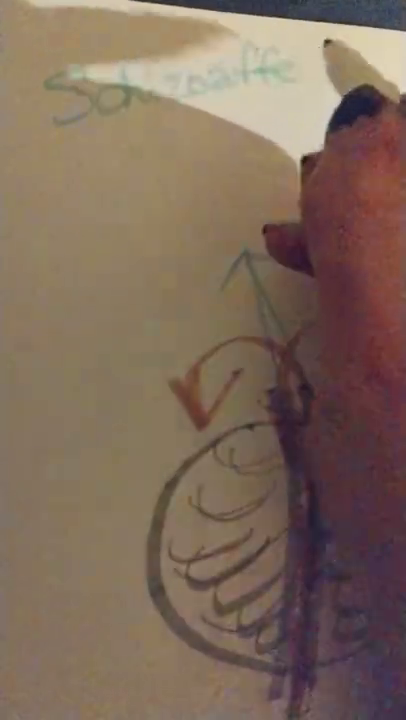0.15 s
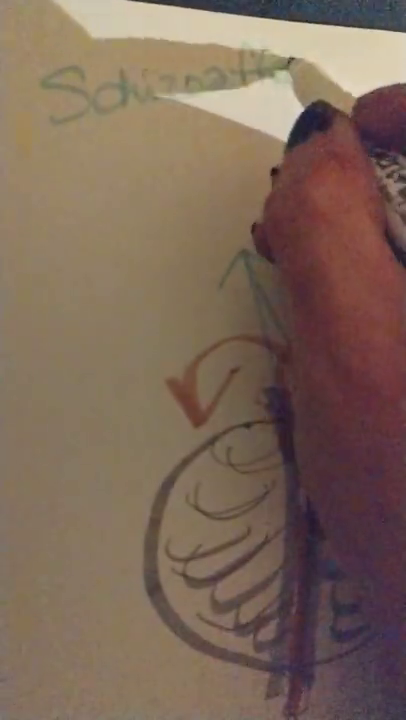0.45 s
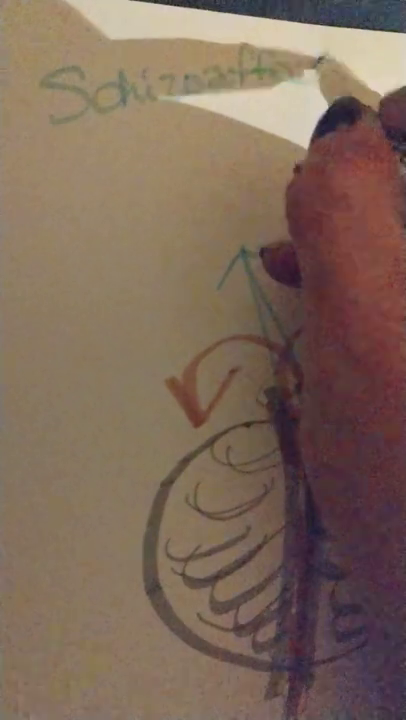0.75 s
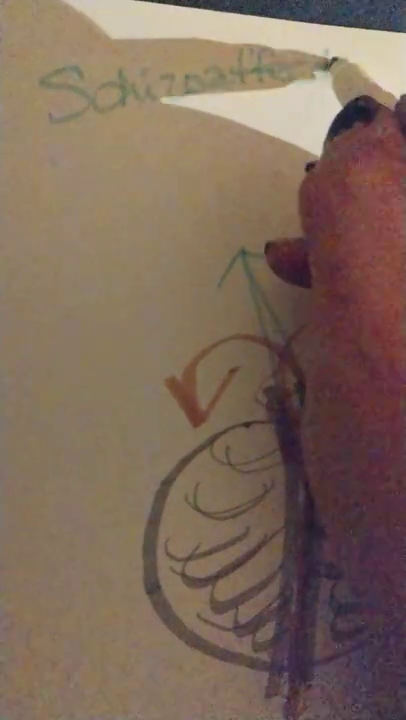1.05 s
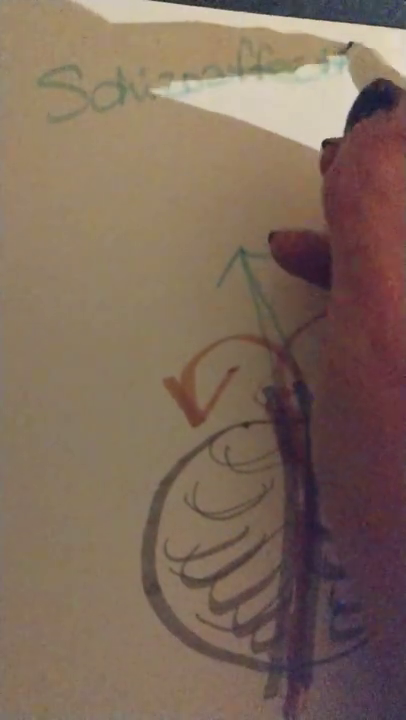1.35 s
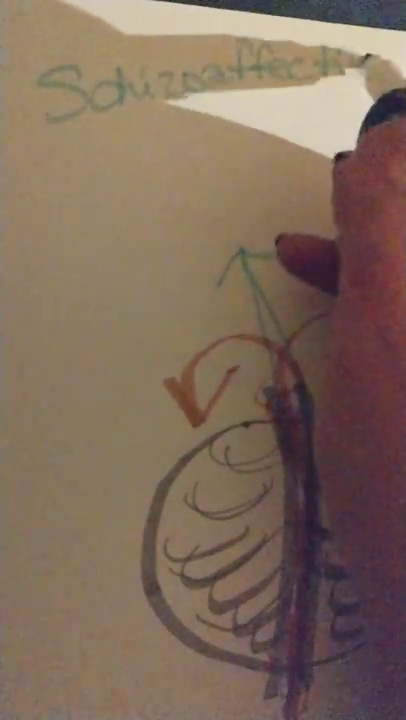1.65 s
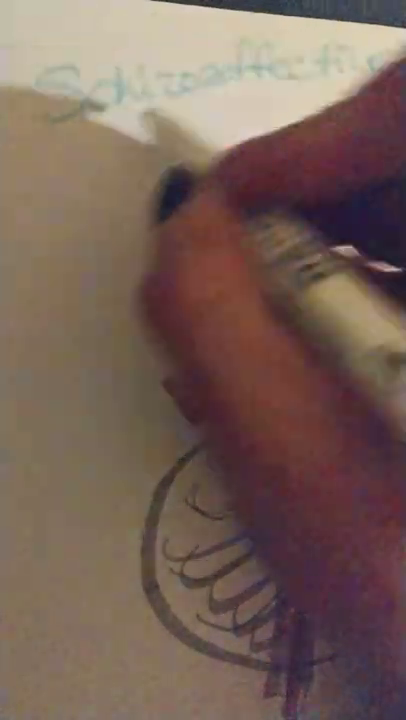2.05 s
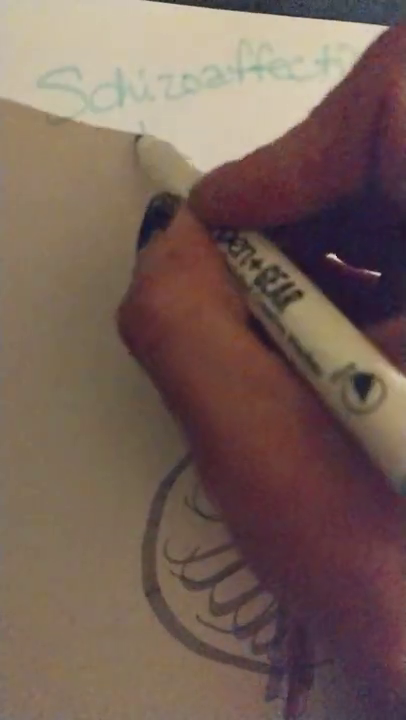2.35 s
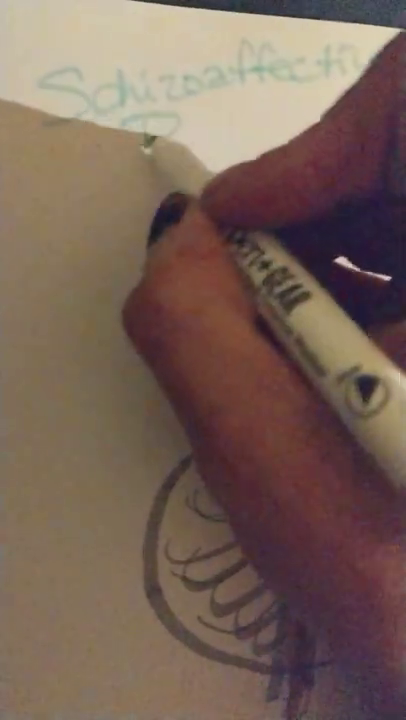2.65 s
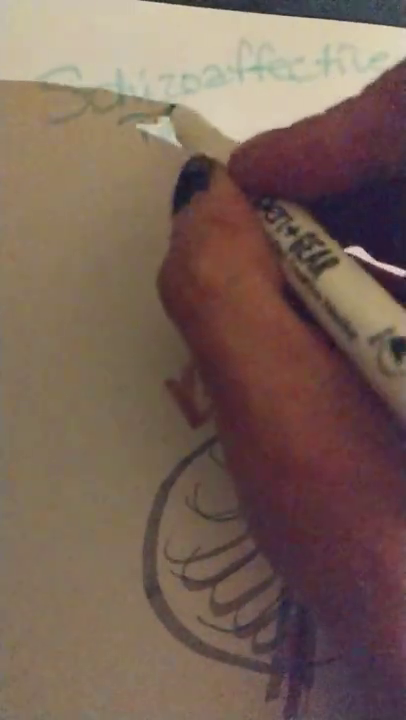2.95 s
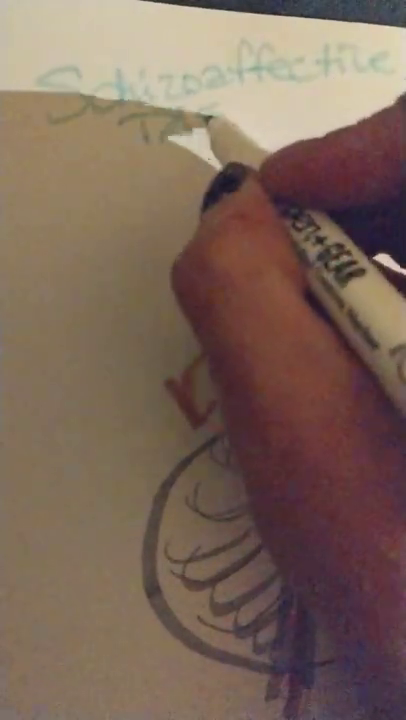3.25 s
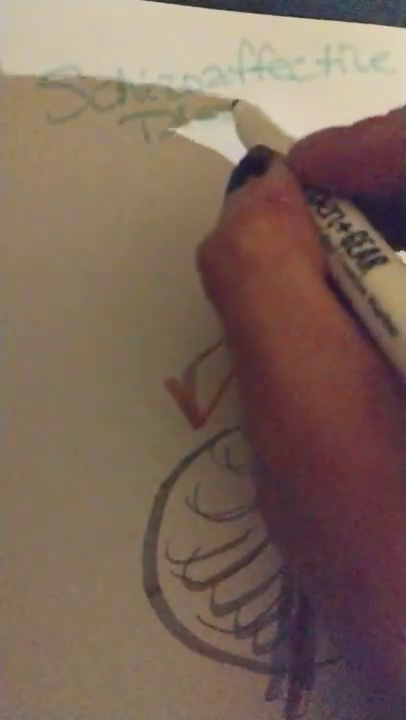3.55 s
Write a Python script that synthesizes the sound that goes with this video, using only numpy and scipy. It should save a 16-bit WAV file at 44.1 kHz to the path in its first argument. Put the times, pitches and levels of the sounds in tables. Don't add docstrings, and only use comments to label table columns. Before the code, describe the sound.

A felt marker tip scratches quick, irregular, high strokes on paper in a quiet room.

```python
import sys
import numpy as np
from scipy import signal
from scipy.fft import rfft, irfft
from scipy.io import wavfile

SR = 44100
rng = np.random.default_rng(int(sys.argv[2]) if len(sys.argv) > 2 else 0)


def generate_wav(sig):
    pcm = np.round(np.clip(np.atleast_2d(sig).T, -1, 1) * 32767).astype(np.int16)
    wavfile.write(sys.argv[1], SR, pcm)


def undo_db(level):
    steps = np.asarray(level, float) / 20
    return 10 ** steps


N = 163170

# start in seconds, length in seconds, level in dB,
# fastest moment as a share of the stroke (0-1), breadth of the sound in dB per octave.
TIP_STROKES = [(-0.02, 0.051, -46.5, 0.22, 8), (0.046, 0.086, -35.5, 0.61, 4.5),
               (0.449, 0.029, -57, 0.06, 9), (0.537, 0.04, -38.5, 0.3, 5.5), (0.62, 0.094, -33, 0.39, 3.5),
               (0.746, 0.037, -46, 0.19, 6), (0.936, 0.038, -55, 0.2, 9), (0.972, 0.035, -52, 0.22, 7),
               (1.035, 0.043, -37.5, 0.73, 5), (1.079, 0.045, -37, 0.19, 4.5),
               (1.333, 0.037, -46.5, 0.2, 2), (1.395, 0.062, -40.5, 0.15, 1),
               (1.548, 0.076, -42.5, 0.71, 7), (1.741, 0.061, -39.5, 0.42, 4),
               (1.835, 0.051, -35.5, 0.2, 4.5), (1.9, 0.083, -33.5, 0.48, 4),
               (2.536, 0.023, -43.5, 0.3, 1.5), (2.583, 0.11, -28, 0.29, -2),
               (2.686, 0.085, -40, 0.47, 1.5), (2.776, 0.088, -39.5, 0.5, 2.5),
               (2.953, 0.035, -51, 0.77, -7), (3.063, 0.019, -43.5, 0.51, -11),
               (3.103, 0.019, -43, 0.2, -6), (3.196, 0.056, -31.5, 0.42, -3),
               (3.272, 0.073, -37, 0.55, 2.5), (3.365, 0.048, -34, 0.58, -0.5),
               (3.414, 0.0059, -41.5, 0.7, 4.5), (3.468, 0.044, -45, 0.5, 3),
               (3.586, 0.075, -37.5, 0.35, 1.5), (3.65, 0.12, -26, 0.66, 2.5)]
# frequency in Hz, gain in dB.
TIP_COLOUR = [(1000, -20), (2000, -17.5), (3600, -16), (5650, -15), (6150, -5), (8700, 1.5), (11400, 0),
              (15500, -26)]


def tip_strokes():
    return rub(TIP_STROKES, TIP_COLOUR, per_speed=1.61, snags_per_s=5000, spread_db=0.5, shade_db=0)


# time in seconds, peak level in dB.
HARD_SNAGS = [(0.0036, -38.5), (0.0753, -32.0), (0.0851, -28.0), (0.0928, -28.0), (0.0989, -25.0),
              (0.1191, -31.0), (0.6408, -22.5), (0.6519, -22.0), (0.6613, -19.0), (0.668, -22.5),
              (1.0632, -28.0), (1.0713, -33.0), (1.0835, -29.0), (1.3345, -39.5), (1.7696, -28.5),
              (1.847, -23.5), (1.8513, -25.5), (1.9305, -26.5), (1.9334, -24.0), (1.9385, -24.5),
              (1.9467, -24.5), (2.5413, -35.0), (2.5946, -20.0), (2.6082, -19.5), (2.6126, -18.5),
              (2.6165, -17.5), (2.6229, -21.0), (2.6306, -17.5), (2.6348, -18.0), (2.6429, -20.0),
              (2.6558, -23.0), (2.6645, -28.0), (3.109, -35.0), (3.2005, -31.5), (3.2248, -23.0),
              (3.2299, -22.0), (3.2334, -24.5), (3.2374, -28.5), (3.289, -34.5), (3.2988, -30.0),
              (3.3135, -27.5), (3.3892, -25.5), (3.3929, -25.0), (3.3962, -21.0), (3.4153, -31.0),
              (3.6072, -27.5), (3.6288, -30.0), (3.6885, -27.0), (3.6926, -24.5), (3.6975, -23.0)]
SNAG_DB, SNAG_SHEET_DB, SNAG_BREADTH_DB = -2, -6, -7
SNAG_S = 0.0009


def hard_snags():
    out = np.zeros((2, N + SR))
    tear_shape = np.hanning(round(2 * SNAG_S * SR))
    for s, peak_db in HARD_SNAGS:
        taps = response(TIP_COLOUR, 0, SNAG_SHEET_DB, SNAG_BREADTH_DB, line_tilt(s))
        tear = tear_shape * rng.standard_normal(len(tear_shape))
        tick = signal.fftconvolve(taps, tear[None], axes=1)
        at = max(round((s - SNAG_S) * SR), 0)
        out[:, at:at + tick.shape[1]] += undo_db(peak_db + SNAG_DB) * tick / abs(tick[0]).max()
    return out[:, :N]


# start in seconds, length in seconds, level in dB,
# fastest moment as a share of the slide (0-1).
HAND_SLIDES = [(-0.008, 0.15, -56, 0.58), (0.128, 0.15, -49.5, 0.67), (0.561, 0.18, -54.5, 0.44),
               (0.812, 0.11, -55.5, 0.27), (1.127, 0.11, -60, 0.32), (1.436, 0.22, -59, 0.43),
               (1.626, 0.081, -54.5, 0.28), (1.781, 0.099, -61, 0.4), (1.975, 0.076, -61.5, 0.4),
               (1.998, 0.2, -57, 0.62), (2.342, 0.08, -56.5, 0.22), (2.458, 0.013, -60.5, 0.7),
               (2.879, 0.087, -57, 0.1), (3.24, 0.029, -56, 0.76), (3.425, 0.052, -56.5, 0.55),
               (3.518, 0.23, -61.5, 0.15), (3.62, 0.083, -50, 0.1), (2.64, 0.065, -49, 0.06)]
# frequency in Hz, gain in dB.
HAND_COLOUR = [(1500, -48), (4000, 6), (6200, 3), (8700, 4), (11400, 7), (13400, 2), (15500, -16)]


def hand_slides():
    return rub(HAND_SLIDES, HAND_COLOUR, per_speed=0.92, snags_per_s=25000, spread_db=1, shade_db=-1.5)


def rub(rows, colour, per_speed, snags_per_s, spread_db, shade_db):
    out = np.zeros((2, N + 2 * SR))
    for start, length, level_db, fastest, *breadth in rows:
        chance = rng.random((SR // 4, 3))
        u = np.arange(0, min(length, 0.24), 1 / SR) / length
        bend = np.log(0.5) / np.log(np.clip(fastest, 0.05, 0.95))
        speed = np.sin(np.pi * u ** bend)
        when, how, sign = chance[:len(u)].T
        strength = undo_db(-spread_db * np.log(np.maximum(how, 0.01)))
        snags = (when < snags_per_s / SR) * strength * np.sign(sign - 0.5)
        drive = evened(snags) * abs(speed) ** per_speed
        taps = response(colour, shade_db, -3, sum(breadth), line_tilt(start))
        sound = signal.fftconvolve(drive[None], taps / np.linalg.norm(taps[0]), axes=1)
        at = SR + round(start * SR)
        out[:, at:at + sound.shape[1]] += undo_db(level_db) * sound
    return out[:, SR:SR + N]


def line_tilt(s):
    return -1.5 if s > 2.2 else 3


# frequency in Hz, gain in dB.
LEFT_PORT = [(5700, -1), (6700, 9), (7750, 9.5), (8800, 18.5), (9750, 17), (10400, 10.5), (11500, 6),
             (13500, 3.5)]
# frequency in Hz, gain in dB.
RIGHT_SHADE = [(2000, -8), (3600, -2), (5600, 1.3), (6300, -2), (8700, -1), (9500, -16.5), (12500, -20.5),
               (15000, -23)]
# frequency in Hz, width in Hz, depth in dB.
RIGHT_DIPS = [(8100, 230, -19), (11500, 500, -9)]
SHEET_T60, SHEET_SAME = 0.018, 0.5
CENTRE_HZ = 8600


def response(colour, shade_db, sheet_db, breadth_db, tilt_db):
    size = 2048
    hz, lag = np.fft.rfftfreq(size, 1 / SR), np.arange(size) / SR
    ring = rng.standard_normal((2, size))
    octaves = np.log2(np.clip(hz, 1500, 16000) / CENTRE_HZ)
    own = read(colour, hz) + breadth_db * abs(octaves) + tilt_db * octaves
    dips = sum(db / (1 + (2 * (hz - f_hz) / width) ** 2) for f_hz, width, db in RIGHT_DIPS)
    tail = (ring + SHEET_SAME * ring[::-1]) * undo_db(-60 * lag / SHEET_T60)
    sheet = 1 + undo_db(sheet_db) * rfft(tail / np.linalg.norm(tail, axis=1, keepdims=True))
    left = causal(own + read(LEFT_PORT, hz))
    right = causal(own + read(RIGHT_SHADE, hz) + dips + shade_db)
    return irfft(sheet * [left, right])


# time in seconds, peak level in dB, pitch in Hz.
DESK_THUMPS = [
    (1.914, -54, 149),
    (2.2415, -52, 146),
    (2.321, -56, 138),
    (2.3422, -56, 117),
    (3.0658, -47, 145),
]


def thumps():
    out, t = np.zeros(N), np.arange(N) / SR
    for s, peak_db, hz in DESK_THUMPS:
        u = (np.pi * hz * (t - s)) ** 2
        out -= undo_db(peak_db) * (1 - 2 * u) * np.exp(-u)
    return out


# frequency in Hz, level in dB per Hz.
ROOM_AIR = [(25, -101), (70, -89.5), (110, -82), (200, -84), (480, -94), (1500, -101), (4000, -108.5),
            (15500, -117)]
# frequency in Hz, width in Hz, left level in dB, right level in dB.
ROOM_HUMPS = [(98.7, 11.6, -73.5, -74.5), (142, 16, -81.5, -81.5), (372, 94, -109, -85),
              (1140, 440, -96.5, -105.5), (2295, 500, -104, -104), (4970, 790, -97.5, -100.5),
              (5310, 930, -99, -98), (7940, 9200, -121, -113)]
# frequency in Hz, likeness (1 same, 0 unrelated, -1 opposite).
LIKENESS = [(30, 1), (100, 0.92), (200, 1), (380, 0.03), (700, -0.095), (1300, -0.6), (2400, 0.072),
            (5000, 0.028)]
AIR_DB, SWELL_DB = -4, 0.6
HUM_HZ, HUM_WIDTH_HZ, HUM_BLUR = 360, 16, 0.75
HUM_DB, HUM_LEAD = [-78, -69.5], 1.6


def room():
    hz, t = np.fft.rfftfreq(N, 1 / SR), np.arange(N) / SR
    power = undo_db(read(ROOM_AIR, hz)) ** 2 * np.ones((2, 1))
    power[0] *= undo_db(read(LEFT_PORT, hz)) ** 2
    for f_hz, width, left_db, right_db in ROOM_HUMPS:
        hump = 1 / (1 + (2 * (hz - f_hz) / width) ** 2) ** 2
        power += undo_db(np.array([[left_db], [right_db]])) ** 2 * hump
    a, b = rfft(rng.standard_normal((2, N)))
    same = np.clip(read(LIKENESS, hz), -1, 1)
    pair = np.array([a, same * a + np.sqrt(1 - same ** 2) * b])
    air = irfft(pair * np.sqrt(power * SR / 2), N)
    line = rfft(rng.standard_normal(N)) / (1 + (2 * (hz - HUM_HZ) / HUM_WIDTH_HZ) ** 2)
    hum = []
    for lead in (HUM_LEAD, 0):
        blur = evened(irfft(line * np.exp(1j * lead), N))
        hum.append(HUM_BLUR * blur + np.cos(2 * np.pi * HUM_HZ * t + lead))
    return air * undo_db(AIR_DB + SWELL_DB * drift(29.64)) + undo_db(np.array(HUM_DB))[:, None] * hum


def drift(per_s):
    t = np.arange(N) / SR
    rates = np.geomspace(per_s / 20, per_s, num=16)
    return evened(sum(np.sin(2 * np.pi * (f * t + rng.random())) / np.sqrt(f) for f in rates))


def evened(x):
    return x / np.sqrt(np.mean(x ** 2) + 1e-20)


def read(points, hz):
    f, value = np.transpose(points)
    return np.interp(np.log(hz + 1), np.log(f + 1), value)


def causal(db):
    cep = irfft(db * np.log(10) / 20)
    cep[1:len(cep) // 2] *= 2
    cep[len(cep) // 2 + 1:] = 0
    return np.exp(rfft(cep))


def scene():
    return tip_strokes() + hard_snags() + hand_slides() + thumps() + room()


def band_limit(x):
    return signal.sosfilt(signal.butter(12, 15770, fs=SR, output="sos"), x)


def record(dry):
    edge = signal.firwin(511, 15780, window=("kaiser", 9), fs=SR)
    mix = signal.oaconvolve(dry, edge[None], "same")
    return band_limit(mix)


dry = scene()
out = record(dry)
generate_wav(out)
```